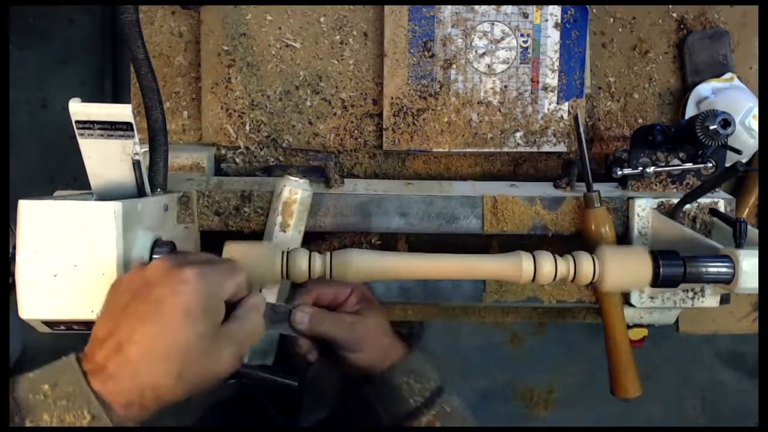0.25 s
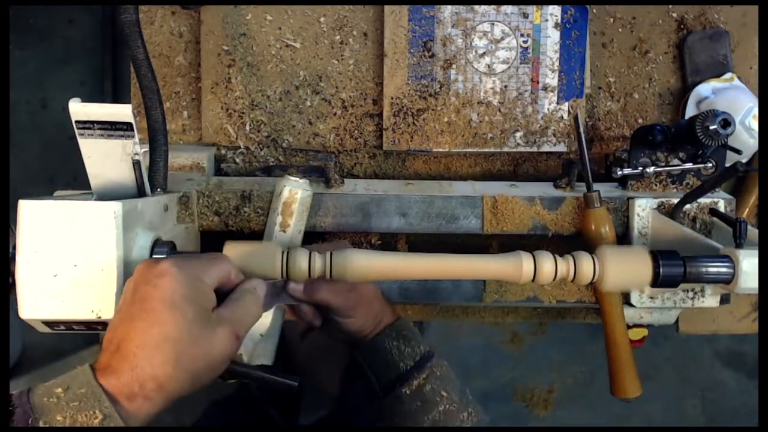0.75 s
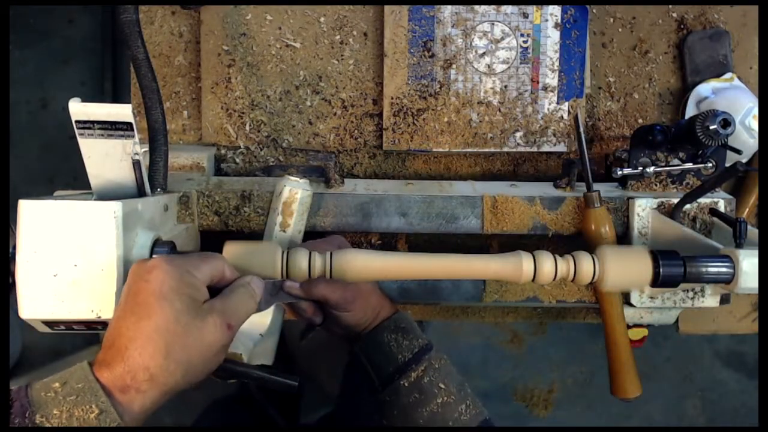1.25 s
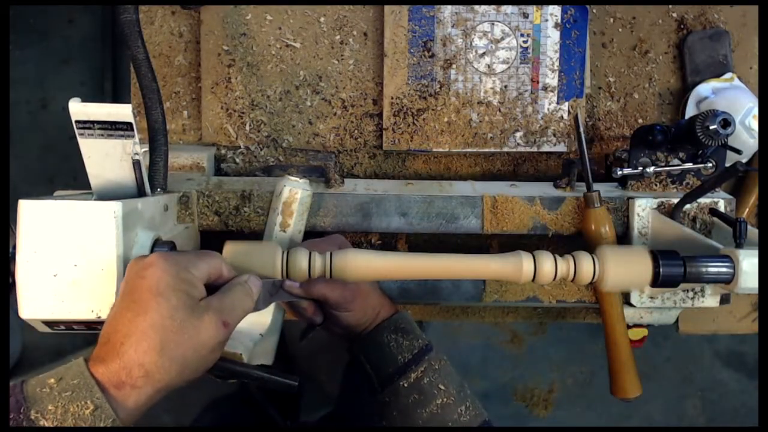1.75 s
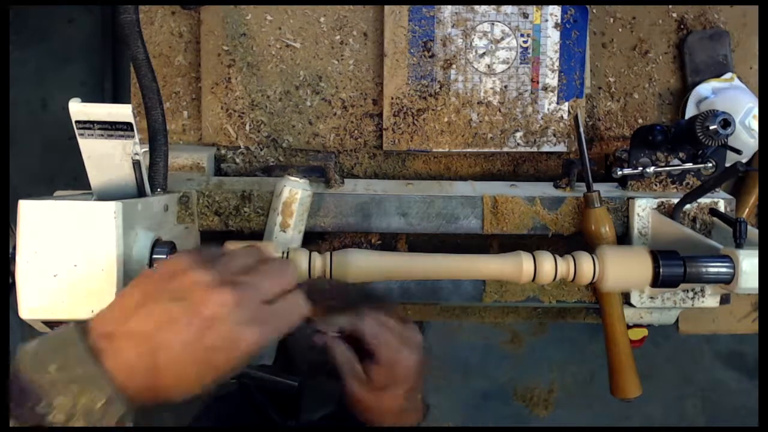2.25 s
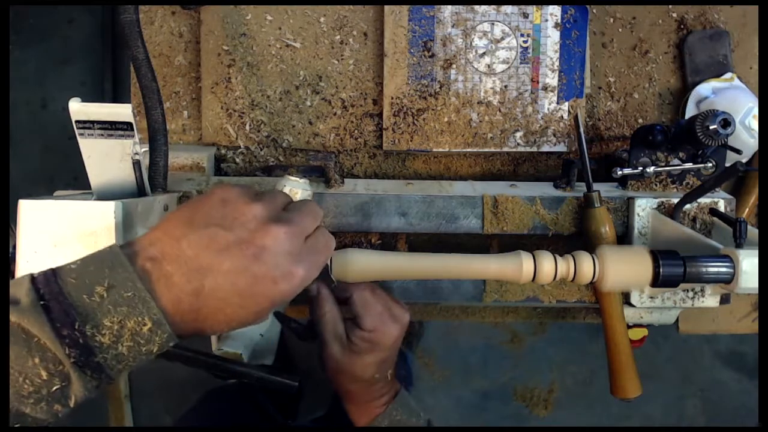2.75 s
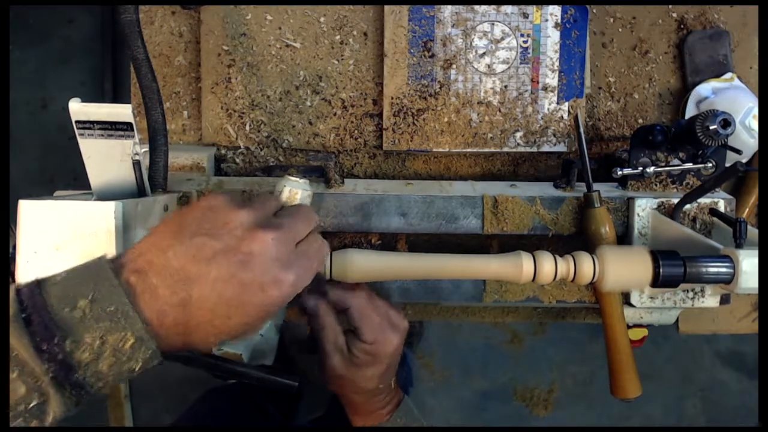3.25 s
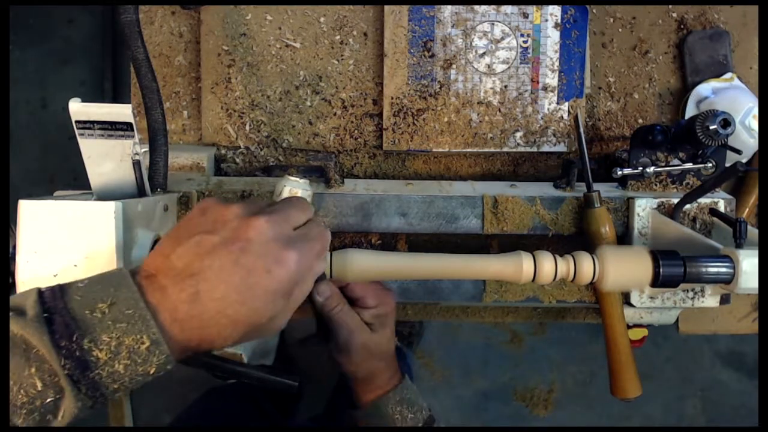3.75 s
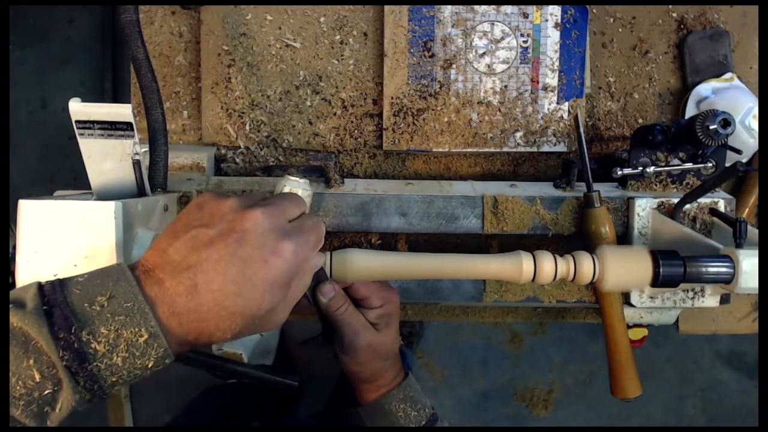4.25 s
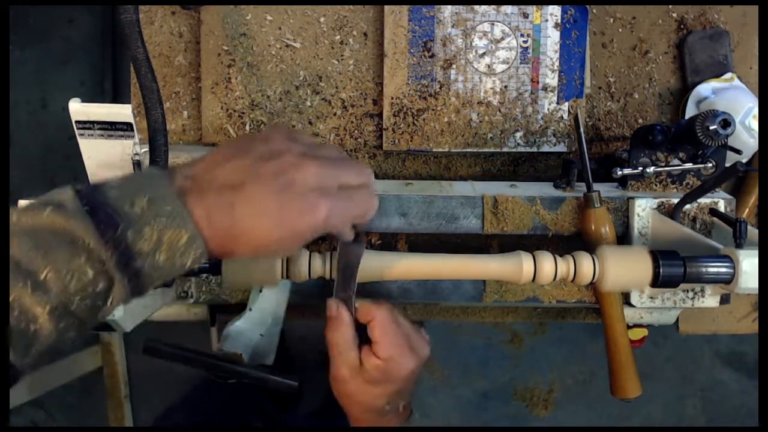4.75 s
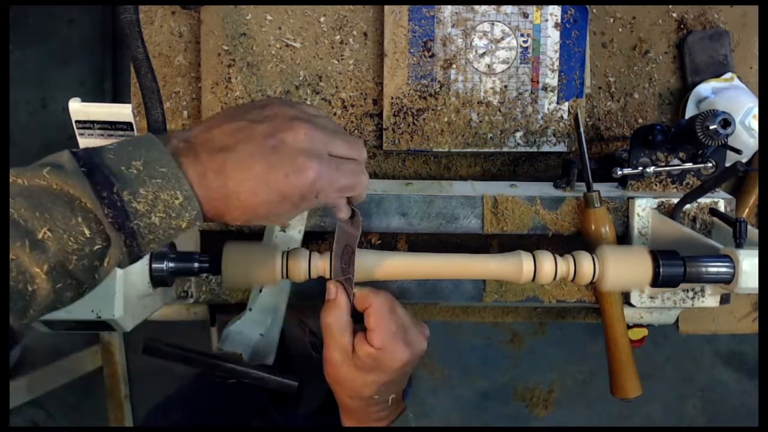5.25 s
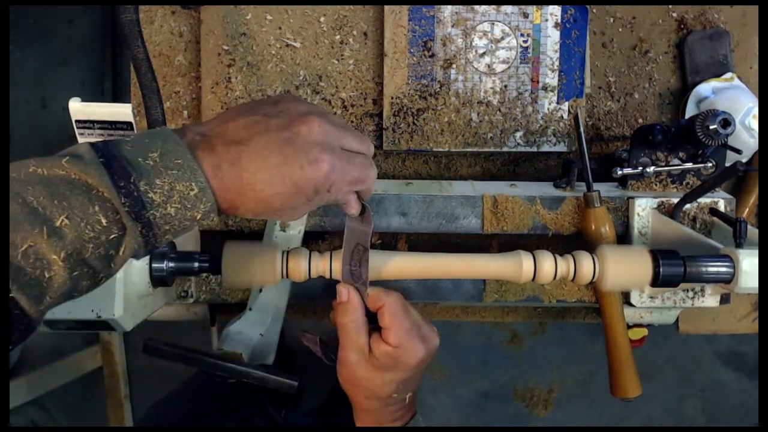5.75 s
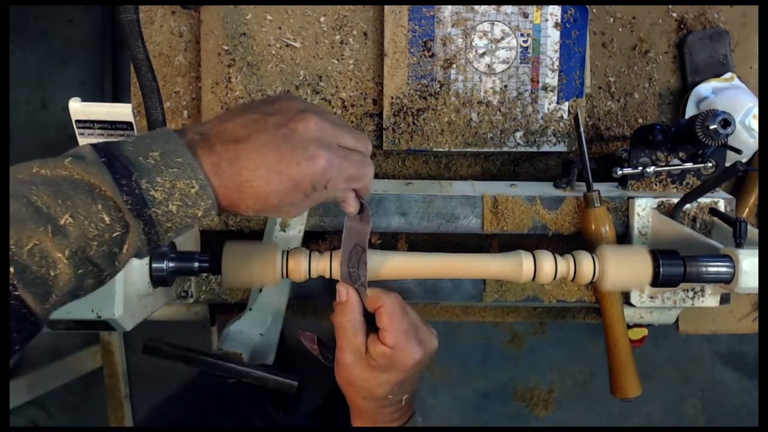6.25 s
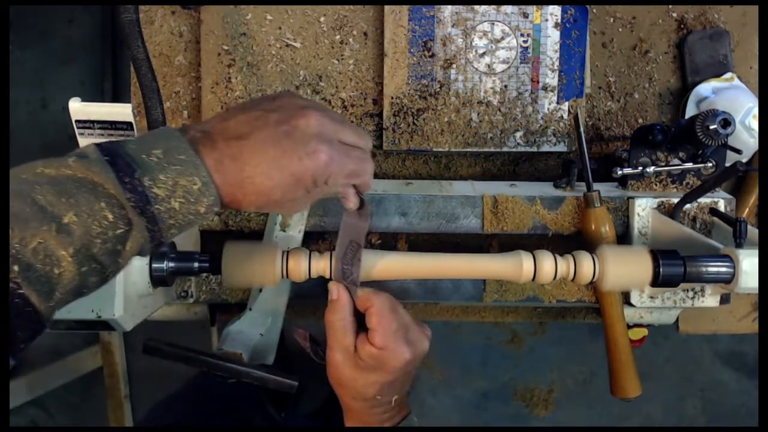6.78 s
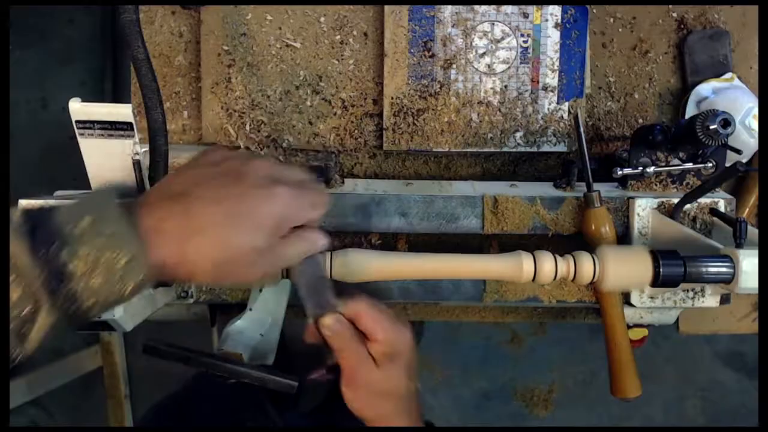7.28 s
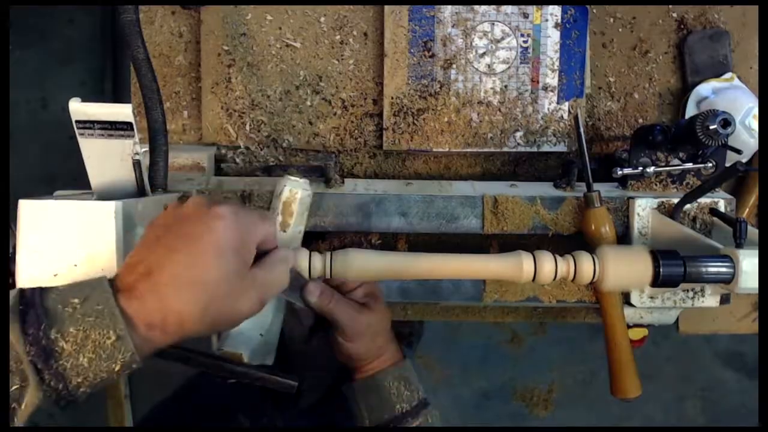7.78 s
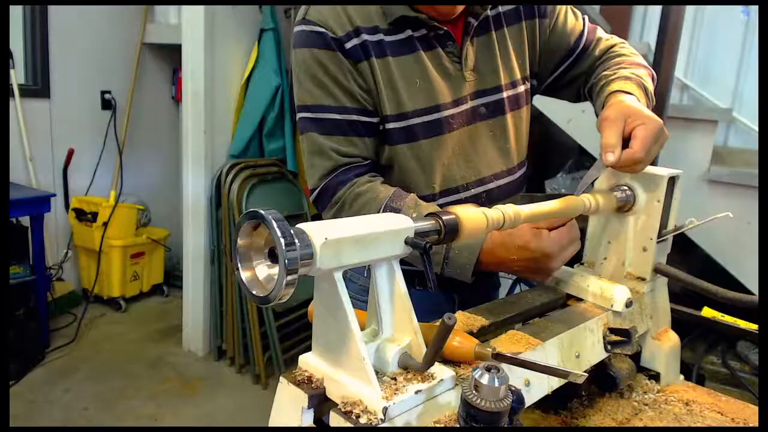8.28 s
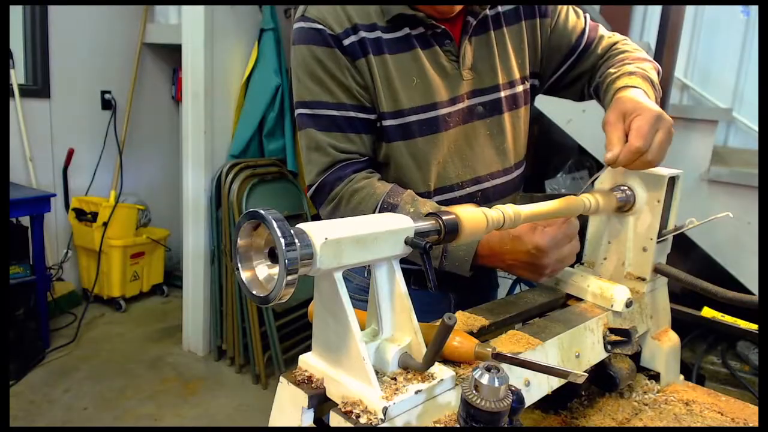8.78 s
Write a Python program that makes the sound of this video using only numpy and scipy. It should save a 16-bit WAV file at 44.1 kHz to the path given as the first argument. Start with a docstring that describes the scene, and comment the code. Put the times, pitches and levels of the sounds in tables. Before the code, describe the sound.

A wood lathe runs throughout with a quiet hum, a thin motor whine and a whirring fan, heard close and without room echo. At about 0.7 seconds sandpaper meets the spinning wooden spindle with a bright, buzzing hiss that lasts until 2.1. A louder pass follows from 2.8 to 3.4, then three short touches between 3.8 and 4.7, the paper singing faintly. From 5 to 7.2 seconds the sanding is softer and uneven, with small catches of grit and a low drone from the spindle. The whole sound cuts out for an instant near 4.4 and again near 6.5 seconds. A last pass starts at 7.7 with a sharp, loud swell, then rasps on with brief high squeals. At about 9 seconds the paper sticks and slips in a loud, pitched chatter.

```python
"""Sandpaper pressed by hand on a wooden spindle turning on a lathe, in several passes.
The same wood comes round 67 times a second, so the hiss buzzes when the hand is steady; the paper
sings and at last sticks and slips in a chatter. Beneath it the motor hums and whines, the fan whirs.
Heard at the lathe as through one microphone, with no room echo. The sound cuts out twice."""
import sys
import numpy as np
from scipy import signal
from scipy.fft import rfft, irfft, next_fast_len
from scipy.io import wavfile
from scipy.ndimage import uniform_filter1d, map_coordinates

SR = 44100
rng = np.random.default_rng(int(sys.argv[2]) if len(sys.argv) > 2 else 0)


def to_wav(sig):
    """Store sig (one row per channel, or 1-D mono) as 16-bit WAV at the path in sys.argv[1].

    Samples outside -1..1 are clipped; the rate is SR.
    """
    pcm = np.clip(np.atleast_2d(sig), -1, 1) * 32767
    pcm = np.round(pcm).astype(np.int16)
    wavfile.write(sys.argv[1], SR, pcm.T)  # frames by channels


N = 397782
TIME = np.arange(N) / SR
IDLE_HZ = 67.3  # turns a second, running free

# Mains hum. Each row: frequency in Hz, level in dB.
MAINS_HUM = [(59.9, -61.5), (119.8, -65.5), (240.1, -53.5), (300.1, -66.5), (720, -66.5), (840, -69),
             (1080, -57.5), (1200, -57.5)]
# Shafts, belt and bearings. Each row: frequency at idle in Hz, level in dB.
SHAFT_TONES = [(67.3, -65.5), (134.6, -67), (149.5, -65), (179.5, -67), (201.9, -58), (209.5, -70.5),
               (269.2, -61), (277.2, -64), (412, -67), (606, -58.5), (623.5, -65.5), (683.5, -67.5),
               (765, -64), (803, -58), (872, -65), (938, -71), (1130, -57.5), (1610, -56.5), (1647, -53.5),
               (2304, -57)]
# The motor's two main notes. Each row: frequency in Hz, level in dB, both at idle.
MOTOR_NOTES = [(1248.7, -42.5), (1368.7, -48.5)]
# The motor's high whine. Each row: frequency at idle in Hz, relative level in dB.
WHINE_TONES = [(2912, -57), (3230, -56), (3472, -57), (3623, -55), (3790, -50), (3871, -52), (4113, -52),
               (4188, -50), (4506, -54), (4748, -49), (4829, -48), (4904, -51), (4985, -55), (5066, -44),
               (5146, -52), (5383, -54), (5464, -52), (5706, -54), (5787, -54), (6024, -50), (6105, -53),
               (6347, -51), (6417, -44)]
# Fan air and bearing noise. Each row: frequency in Hz, relative spectral level in dB.
WHIR_SPECTRUM = [(20, -46.5), (40, -27.5), (58, -19.5), (90, -24), (138, -16.5), (171, -20.5), (233, -11.5),
                 (310, -20), (720, -13), (950, -14.5), (1450, -11.5), (3300, -12), (5000, -5.5),
                 (5500, -11), (6750, -12), (7300, -35), (8000, -58.5)]
# The paper is held to the wood. Each row: start, end, attack and release in seconds, base hiss level
# in dB, low rasp and top edge in dB relative to the hiss, share (0-1) of the friction that repeats
# once bedded in, drag on the spindle in turns a second.
PASSES = [ (0.743, 2.128, .006, 0.034, -16.5, -14, -3.5, 0.89, .37),
          (2.81, 3.403, 0.073, 0.22, -12.5, -10, -3, 0.5, 0.29),
          (3.779, 4.115, 0.064, .075, -19, -15.5, -3.5, 0.4, 0.074),
          (4.181, 4.403, 0.014, .02, -16.5, -15, -2, .5, .08),
          (4.458, 4.717, .025, 0.036, -16.5, -15.5, -2.5, .5, 0.12),
          (4.977, 6.568, 0.094, .02, -24.5, -14.5, -2, 0.33, .48),
          (6.565, 7.239, .02, .07, -26.5, -12, -2, .12, 0.38),
          (7.676, 9.2, 0.022, .02, -19, -14, -6, 0.59, .32), ]
# The hand leans in, lets up or tilts the paper. Each row: middle and length in seconds,
# then the changes of level, low rasp and top edge in dB.
LEANS = [ (0.752, .07, -4, -4.5, -3.5), (0.835, .08, 3.5, -5, -2.5), (0.944, 0.086, 5.5, -4, -.5),
         (1.05, 0.11, 2.5, 0, .5), (1.56, 0.11, -4.5, 1, 0.5), (2.055, .13, -1, -0.5, -1),
         (2.925, .11, 3.8, -8.5, 0.5), (3.182, 0.066, 2.5, 1, .5), (4.285, 0.074, 3, -3, -3),
         (4.57, 0.11, 4, -8, 1.5), (5.406, .04, 6, 1, 1), (5.485, .07, 3.5, 5, 1),
         (5.907, 0.082, 2.5, 4, -1), (6.22, 0.064, 8, 0.5, 1.5), (6.497, 0.15, 4.5, 1, -0.5),
         (6.875, 0.15, 3.5, 0, 0.5), (7.135, .06, 4, -3.5, 0), (7.753, 0.077, 13.5, -14, -8),
         (8.106, 0.13, 3.5, 9.5, -2), (8.219, .12, 1, 8, -1.5), (8.54, 0.11, 2.5, 1.5, -3.5),
         (8.665, 0.11, 8, -3.5, 3.5), (8.822, 0.24, 0, 1, 4), (8.997, 0.095, 5, -4, 2.5), ]
# The paper's hiss. Each row: frequency in Hz, relative spectral level in dB.
PAPER_SPECTRUM = [(300, -32), (420, -36.5), (800, -17.5), (1200, -15), (1500, -14.5), (1850, -7),
                  (2200, -12), (2950, -6.5), (3200, -9), (3550, -4.5), (6200, 0), (6800, -3.5), (7250, -19),
                  (7600, -29.5)]
# The paper sings. Each row: start and end in seconds, centre and width in Hz, relative lift in dB.
PAPER_RESONANCES = [(0.738, 1.1, 3710, 300, 6.5), (0.74, 1.1, 4270, 220, 10.5),
                    (1.105, 1.497, 6170, 160, 4.5), (1.213, 2.14, 3660, 109, 5.5),
                    (1.522, 2.104, 3535, 90, 11), (1.62, 2.02, 1960, 347, 7.5),
                    (1.612, 2.02, 5740, 400, 3.5), (3.12, 3.257, 1970, 150, 10),
                    (3.126, 3.238, 2820, 250, 7.5), (3.84, 4.08, 2960, 100, 12),
                    (3.83, 4.08, 4030, 160, 4.5), (4.205, 4.36, 2980, 120, 7), (4.2, 4.36, 4080, 160, -1.5),
                    (4.258, 4.33, 5180, 220, 12.5), (4.49, 4.7, 2643, 160, 3.5), (4.48, 4.7, 3860, 350, 3),
                    (4.48, 4.7, 6100, 179, 6.5), (5.349, 5.646, 3130, 300, 13),
                    (5.503, 5.9, 3980, 248, 6.5), (7.69, 7.818, 4710, 336, 17), (8.041, 8.3, 2370, 120, 12),
                    (8.043, 8.29, 2860, 119, 11), (8.038, 8.29, 3410, 170, 15.5),
                    (8.257, 8.44, 3740, 250, 8.5), (8.3, 8.844, 2824, 59.6, 5.5),
                    (8.366, 8.62, 4320, 453, 4), (8.471, 8.65, 5534, 90, 14.5),
                    (8.59, 8.715, 5710, 222, 19), (8.773, 8.886, 6540, 350, 19),
                    (8.887, 8.99, 4725, 200, 22)]
# The grit catches. Each row: middle and length in seconds, lift in dB.
SNAGS = [(0.748, 0.0071, 1.5), (4.205, .004, 1.5), (5.014, 0.0096, 10), (6.608, 0.028, 5.5),
         (6.726, 0.032, 5), (7.73, 0.013, 2)]
# The spindle's drone swells and fades. Each row: time in seconds, level in dB.
DRONE_LEVELS = [(4.9, -75), (5.2, -55.5), (5.6, -51), (5.95, -49.5), (6.15, -54), (6.6, -54), (6.9, -51),
                (7.15, -52), (7.3, -75)]
# The drone's partials. Each row: frequency at idle in Hz, relative level in dB.
DRONE_PARTIALS = [(201.9, 0), (336.5, -11), (807.6, -5), (874.9, -5)]
# The chatter builds. Each row: time in seconds, level in dB.
CHATTER_LEVELS = [(8.945, -65), (8.965, -23.5), (8.99, -21.5), (9.02, -15)]
# The chatter's partials. Each row: multiple of the slip rate, relative level in dB.
CHATTER_PARTIALS = [(2, -21), (3, -5), (4, -7), (5, -1), (6, -9), (7, 1.5), (8, -5), (9, -1.5), (10, 0),
                    (11, -2), (12, -8), (14, -7), (16, -4)]
# The sound cuts out. Each row: start and end in seconds.
DROPOUTS = [(4.361, 4.462), (6.521, 6.581)]


def amp(db):
    """Decibels to gain."""
    return 10 ** (np.asarray(db) / 20)


def unit_rms(x):
    """Scales to an rms of 1."""
    return x / np.sqrt(np.mean(x ** 2) + 1e-20)


def envelope(rows):
    """Gain over time from (seconds, dB) rows."""
    return amp(np.interp(TIME, *np.transpose(rows)))


def spectrum_gain(rows, hz):
    """Gain from (Hz, dB) rows joined on a log-frequency axis."""
    row_hz, db = np.transpose(rows)
    return amp(np.interp(np.log(hz + 1), np.log(row_hz + 1), db))


def drift(per_s):
    """A random wander of rms 1."""
    knots = rng.standard_normal(2048)
    return unit_rms(np.interp(TIME * per_s, np.arange(len(knots)), knots))


def hump(offset_s, length_s):
    """A rounded swell of height 1."""
    return np.exp(-np.abs(2 * offset_s / length_s) ** 3)


def spindle_speed(inertia_s=0.1993):
    """Turns a second: each pass drags the spindle a little below idle, and the speed lags the drag."""
    drag = sum(sag * ((TIME > start) & (TIME < end)) for start, end, *_, sag in PASSES)
    keep = np.exp(-1 / (inertia_s * SR))
    return IDLE_HZ - signal.lfilter([1 - keep], [1, -keep], drag)


def tones(rows, clock, waver_rad, flutter_db, wavers_per_s=18):
    """Machine tones that follow a clock, each wavering a little in phase and level."""
    sound = np.zeros(N)
    for hz, db in rows:
        gain = amp(db + flutter_db * drift(13))
        phase = 2 * np.pi * (hz * clock + rng.random()) + waver_rad * drift(wavers_per_s)
        sound += gain * np.sin(phase)
    return np.sqrt(2) * sound


def motor_whine(clock, whistle_hz=4430, first_crest_s=.08, beat_s=2.46):
    """A cluster of high motor tones, with one whistle that swells in a slow, regular beat."""
    from_crest_s = (TIME - first_crest_s + beat_s / 2) % beat_s - beat_s / 2
    swell_db = 8 * hump(from_crest_s, length_s=.26)
    whistle = tones([(whistle_hz, -45)], clock, waver_rad=.6, flutter_db=2.2) * amp(swell_db)
    cluster = tones(WHINE_TONES, clock, waver_rad=0.66, flutter_db=4.5)
    shared_db = 0.06 * (swell_db - np.mean(swell_db)) + 1.5 * drift(29)  # the tones swell together
    return whistle + cluster * amp(shared_db - 1)


def lathe(turns, speed):
    """Mains hum, plus shaft and motor tones that sag under load; the motor is clearest running free."""
    clock = turns / IDLE_HZ
    load = np.clip((IDLE_HZ - speed) / 0.65, 0, 1)
    hum = tones(MAINS_HUM, TIME, waver_rad=0.078, flutter_db=-2.5)
    shafts = tones(SHAFT_TONES, clock, waver_rad=0.12, flutter_db=3.0)
    motor = tones(MOTOR_NOTES, clock, waver_rad=.1, flutter_db=2.05)
    return hum + shafts + motor * amp(-3 * load) + motor_whine(clock) * amp(-7 * load)


def worn_surface(turns, lasting_turns, size=660):
    """A rough surface coming round: each turn is a slightly worn copy of the last."""
    keep = np.exp(-1 / lasting_turns)
    rings = signal.lfilter([1], [1, -keep], rng.standard_normal((size, size)), axis=0)
    return unit_rms(map_coordinates(rings.ravel(), [turns * size], order=3))


def whir(turns, level_db=-34.5, rattle_db=1.5, repeat_share=0.18):
    """Fan air and bearing noise, some of it recurring at 4/9 of the spindle's rate."""
    fresh = np.sqrt(1 - repeat_share) * rng.standard_normal(N)
    repeating = np.sqrt(repeat_share) * worn_surface(turns * 4 / 9, lasting_turns=12)
    rattling = (fresh + repeating) * amp(rattle_db * drift(150))
    size = next_fast_len(N)
    colour = spectrum_gain(WHIR_SPECTRUM, np.fft.rfftfreq(size, 1 / SR))
    air = irfft(rfft(rattling, size) * colour, size)[:N]
    return amp(level_db) * unit_rms(air)


def hand(ease_db_per_s=0.32, first_touch_share=0.23, bed_in_s=0.47, loosen_s=0.13):
    """The hand's passes and leans as hiss gain, low rasp, top edge and the share of repeating friction."""
    gain, rasp_db, edge_db, steady = np.zeros((4, N))
    for start, end, attack, release, level_db, pass_rasp_db, pass_edge_db, bedded_share, _ in PASSES:
        age = np.maximum(TIME - start, 0)
        contact = np.clip(np.minimum(age / attack, (end - TIME) / release), 0, 1)
        gain += contact * amp(level_db - ease_db_per_s * age)
        begun = TIME > start - .02
        rasp_db[begun], edge_db[begun] = pass_rasp_db, pass_edge_db
        # the paper beds in, then works loose as the hand begins to lift
        seated = (1 - np.exp(-age / bed_in_s)) * np.clip((end - TIME) / loosen_s, 0, 1)
        steady = np.where(begun, first_touch_share + (bedded_share - first_touch_share) * seated, steady)
    for at, length, lift_db, more_rasp_db, more_edge_db in LEANS:
        lean = hump(TIME - at, length)
        gain *= amp(lift_db * lean)
        rasp_db += more_rasp_db * lean
        edge_db += more_edge_db * lean
        steady -= 0.01 * max(more_rasp_db, 0) * lean  # a rasping lean buzzes a little less
    return gain, rasp_db, edge_db, np.clip(steady, 0, 1)


def friction(turns, steady, bumps_db=1.56, runout_db=1.0, tremble_db=1.82):
    """Two scrapes, the repeating wood and fresh loose grit; high spots and run-out vary the pressure."""
    scrapes = np.array([worn_surface(turns, lasting_turns=28), rng.standard_normal(N)])
    high_spots = np.sqrt(steady) * worn_surface(turns, lasting_turns=6.7)
    stray_bumps = np.sqrt(1 - steady) * rng.standard_normal(N)
    bumps = unit_rms(uniform_filter1d(high_spots + stray_bumps, size=60))
    runout = steady * np.sin(2 * np.pi * turns)
    pressure_db = bumps_db * bumps + runout_db * runout + tremble_db * drift(35)
    return unit_rms(scrapes * amp(pressure_db))


def hand_echoes(t, hz, depth_db=2.5, spacing_hz=80, shifts_per_s=2.53):
    """Reflections between hands, wood and lathe bed ripple the spectrum, shifting as the hands move."""
    field = rng.standard_normal((512, 64))
    grid = np.meshgrid(hz / spacing_hz, t * shifts_per_s, indexing="ij")
    return amp(depth_db * map_coordinates(field, grid, order=1))


def singing_paper(t, hz, fade_s=0.039):
    """The paper's rippled spectrum over time, with the passing resonances that make it sing."""
    shape = spectrum_gain(PAPER_SPECTRUM, hz)[:, None] * hand_echoes(t, hz)
    for start, end, centre_hz, width_hz, lift_db in PAPER_RESONANCES:
        held = np.clip(np.minimum(t - start, end - t) / fade_s, 0, 1)
        detuning = 2 * (hz[:, None] - centre_hz) / width_hz
        shape *= 1 + (amp(lift_db) - 1) * held / (1 + detuning ** 2)
    return shape


def paper_colour(t, hz, rasp_db, edge_db):
    """The paper's spectrum, its power shared by the hand between low rasp, middle and top edge."""
    shape = singing_paper(t, hz)

    def band_gain(low_hz, high_hz, power):
        band = shape[(hz > low_hz) & (hz < high_hz)]
        return np.sqrt(power / (band ** 2).sum(0) * len(hz))

    edge_share = np.clip(amp(edge_db) ** 2, .03, .95)
    rasp = band_gain(1400, 3200, amp(rasp_db) ** 2)
    middle = band_gain(3300, 5600, 1 - edge_share)
    top = band_gain(5600, 7500, edge_share)
    above_rasp = np.clip((hz[:, None] - 3300) / 410 + .5, 0, 1)
    above_middle = np.clip((hz[:, None] - 5600) / 400 + .5, 0, 1)
    upper = middle * (1 - above_middle) + top * above_middle
    return shape * (rasp * (1 - above_rasp) + upper * above_rasp)


def sanding(turns):
    """Friction coloured by the paper, as loud as the hand presses, jumping where the grit catches."""
    gain, rasp_db, edge_db, steady = hand()
    hz, t, (repeating, fresh) = signal.stft(friction(turns, steady), SR, nperseg=1024, noverlap=768)
    share = np.interp(t, TIME, steady) ** ((hz[:, None] / 5000) ** 0.35)  # coarse marks repeat best
    scrape = np.sqrt(share) * repeating + np.sqrt(1 - share) * fresh
    colour = paper_colour(t, hz, np.interp(t, TIME, rasp_db), np.interp(t, TIME, edge_db))
    # small paper radiates little bass
    low_cut = spectrum_gain([(600, -5), (1250, -4), (1650, -0.5)], hz)[:, None]
    hiss = signal.istft(scrape * colour * low_cut, SR, nperseg=1024, noverlap=768)[1][:N]
    snag_db = sum(lift_db * np.exp(-(2 * (TIME - at) / length) ** 2) for at, length, lift_db in SNAGS)
    return hiss * gain * amp(snag_db)


def spindle_drone(turns):
    """A taut strip of paper makes the spindle drone on harmonics of its turning rate."""
    drone = tones(DRONE_PARTIALS, turns / IDLE_HZ, waver_rad=.75, flutter_db=2.2, wavers_per_s=45)
    return drone * envelope(DRONE_LEVELS)


def chatter(turns, slips_per_turn=4, jitter_cycles=0.0059):
    """The paper sticks and slips in step with the spindle."""
    slips = slips_per_turn * turns + jitter_cycles * drift(200)
    tone = sum(amp(db) * np.cos(2 * np.pi * (k * slips + rng.random())) for k, db in CHATTER_PARTIALS)
    return unit_rms(tone) * envelope(CHATTER_LEVELS) * (TIME > CHATTER_LEVELS[0][0])


def scene():
    """Sandpaper and lathe from one spot, the same in both channels."""
    speed = spindle_speed()
    turns = np.cumsum(speed) / SR
    mono = sanding(turns) + chatter(turns) + lathe(turns, speed) + spindle_drone(turns) + whir(turns)
    return np.array([mono, mono])


def record(dry, fade_in_s=0.017, ceiling=.88, cutoff_hz=7500):
    """The microphone's signal drops out twice, overloads softly near full scale and loses its top."""
    live = np.ones(N)
    for start, end in DROPOUTS:
        fall_db = np.interp(TIME - start, [0, .002, .015, .03], [0, -31, -38, -90])  # sudden, faint tail
        fade_in = np.clip((TIME - end) / fade_in_s, 0, 1)
        live *= np.maximum(amp(fall_db), fade_in)
    heard = dry * live
    rounded = heard / (1 + (heard / ceiling) ** 8) ** (1 / 8)
    low_pass = signal.firwin(511, cutoff_hz, window=("kaiser", 9), fs=SR)
    return signal.oaconvolve(rounded, low_pass[None], "same")


dry = scene()
out = record(dry)
to_wav(out)
```